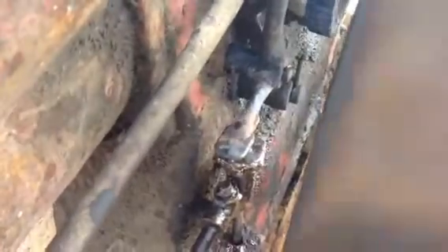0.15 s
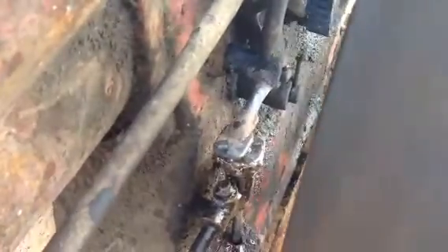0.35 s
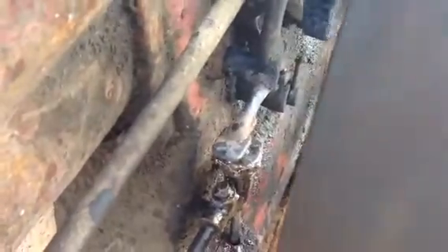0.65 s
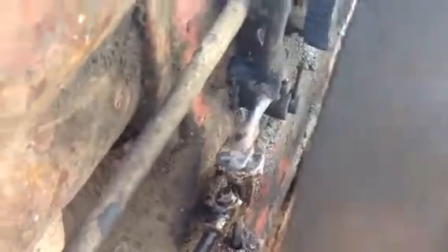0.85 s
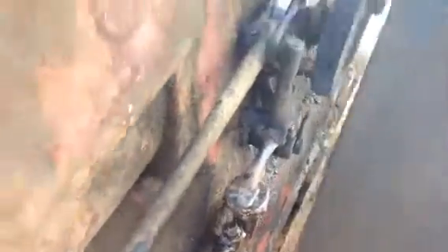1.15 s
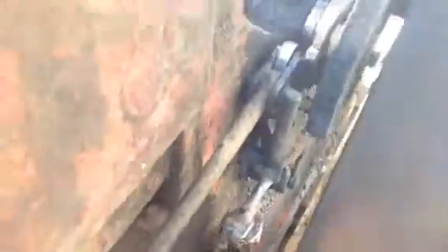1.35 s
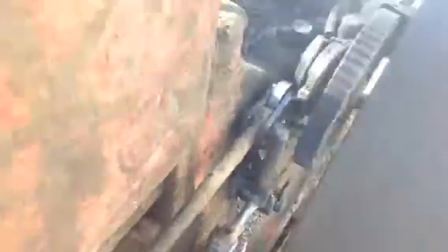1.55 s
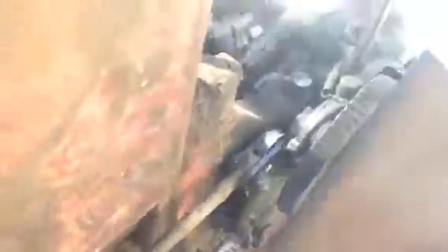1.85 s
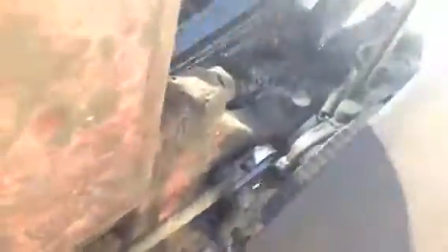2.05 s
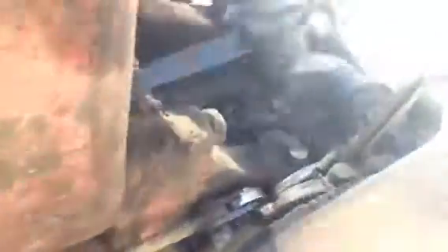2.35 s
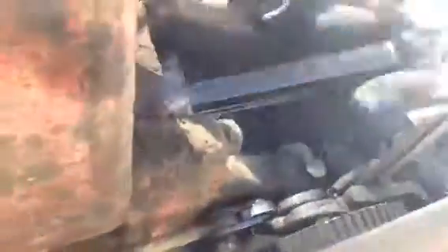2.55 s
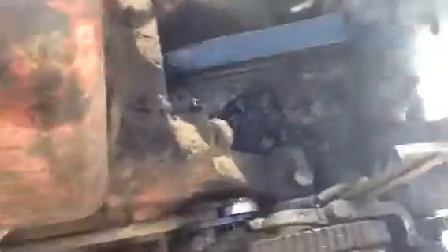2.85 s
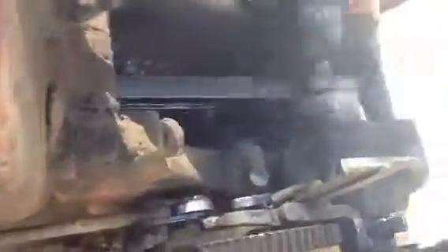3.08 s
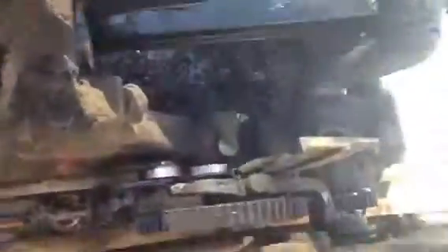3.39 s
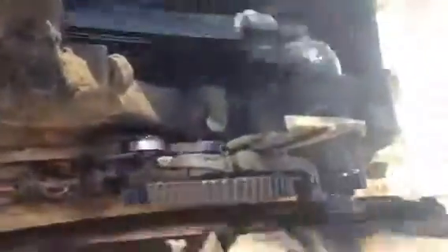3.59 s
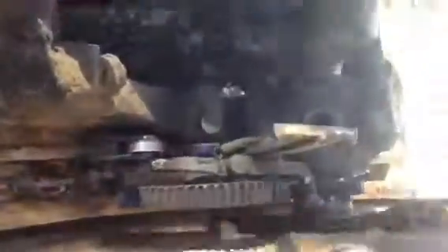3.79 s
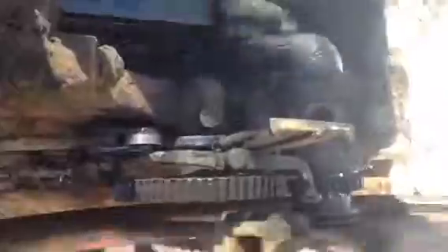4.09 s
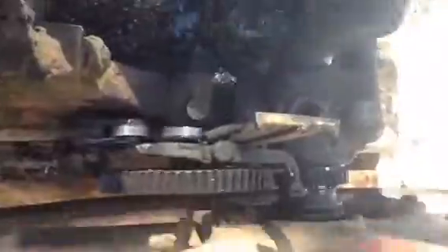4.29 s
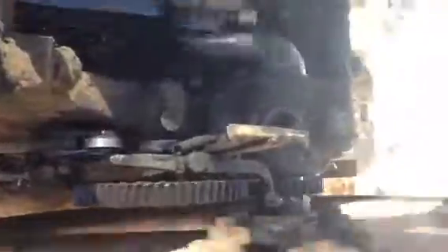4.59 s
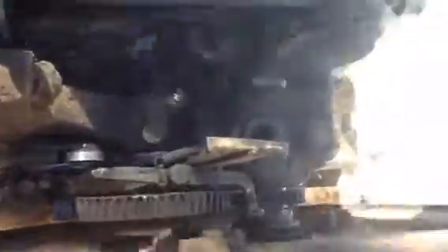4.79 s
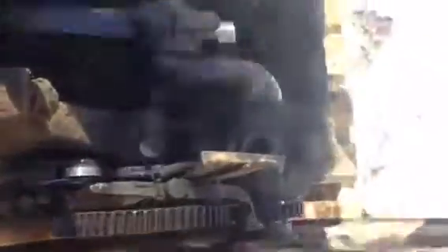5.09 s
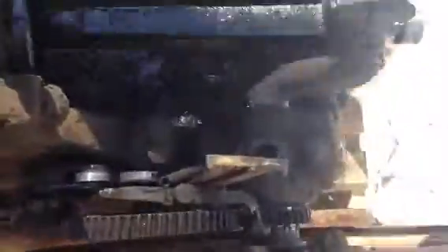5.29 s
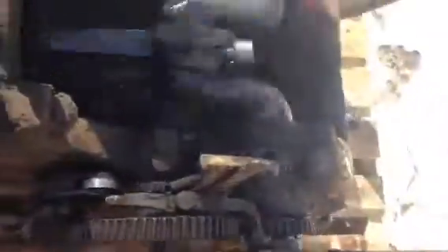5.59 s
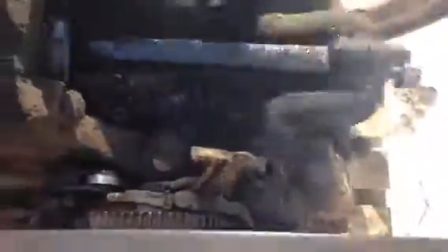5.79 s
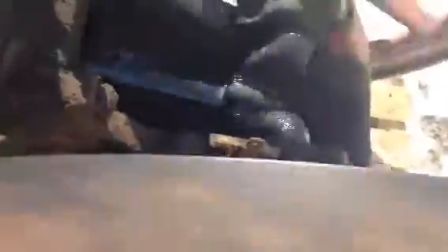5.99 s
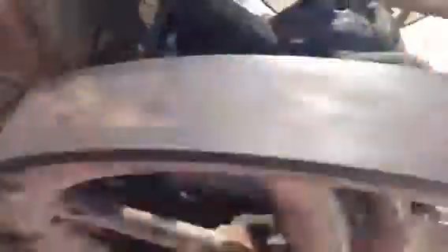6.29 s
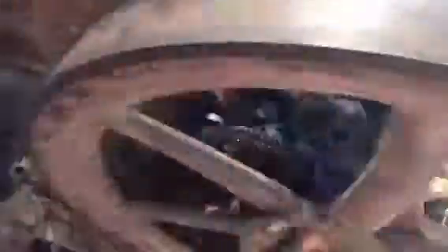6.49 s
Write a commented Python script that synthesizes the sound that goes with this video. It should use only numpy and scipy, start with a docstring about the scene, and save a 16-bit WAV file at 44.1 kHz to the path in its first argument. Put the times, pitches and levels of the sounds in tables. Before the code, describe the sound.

Heavy metal knocks repeat a little over twice a second as an old flywheel engine turns outdoors, slowly losing speed. Rods tap back between the knocks, a latch clacks every second turn, and springs tick over a soft rumble and hiss. The close microphone moves along the machine, so an early ringing hum fades and brief gusts from the flywheel hit it from about two seconds on.

```python
"""An old hit-and-miss engine coasts outdoors at a little over two turns a second, slowly losing speed.
Each turn, the load on the crank reverses with a hollow knock, then the linkage taps and knocks back.
Every second turn the steel governor latch clacks. Gears rumble, dry spots rub, loose parts rattle.
The microphone moves from the ringing cylinder casting to the flywheel, where puffs of air buffet it."""
import sys
import numpy as np
from scipy import signal
from scipy.fft import rfft, irfft
from scipy.io import wavfile

SR = 44100
rng = np.random.default_rng(int(sys.argv[2]) if len(sys.argv) > 2 else 0)


def store_wav(level_fs):
    """Save 16-bit WAV to argv[1]."""
    pcm = np.round(np.clip(np.atleast_2d(level_fs), -1, 1) * 32767)
    wavfile.write(sys.argv[1], SR, pcm.T.astype(np.int16))


N = 292824
TIME = np.arange(N) / SR


def from_db(db):
    """Turn decibels into a gain."""
    return 10 ** (np.asarray(db) / 20)

def rms_one(x):
    """Scale a signal to an average (rms) strength of 1."""
    return x / np.sqrt(np.mean(x ** 2) + 1e-20)

def gain_at(colour, hz):
    """Read gains from a colour: a table of how strong the lows and highs are."""
    points_hz, db = np.transpose(colour)
    return from_db(np.interp(np.log(hz + 1e-3), np.log(points_hz), db))

def noise(colour):
    """Steady noise of a given colour."""
    hz = np.fft.rfftfreq(N, 1 / SR)
    return rms_one(irfft(rfft(rng.standard_normal(N)) * gain_at(colour, hz) * (hz > 20), N))

def drift(rate):
    """Random wavering that glides to `rate` new values a second."""
    return np.interp(TIME * rate, np.arange(N), rng.standard_normal(N))

def ring(drive, hz, t60):
    """Shake one ringing tone. Its ring time, t60, is the seconds it takes to fade by 60 dB."""
    decay, step = from_db(-60 / (t60 * SR)), 2 * np.pi * hz / SR
    return signal.lfilter([0, np.sin(step)], [1, -2 * decay * np.cos(step), decay ** 2], drive + 1e-18)

def uneven(times, level_db, spread_db=1.0):
    """No two strokes are alike: give each a slightly different level."""
    return level_db + spread_db * rng.standard_normal(len(times))

def strike(times, levels_db, tones, contact_s, spread_db):
    """Blows on metal: each of its tones swells during the contact, then rings out."""
    out, age = np.zeros(N), TIME[:SR // 2]
    starts = np.clip(times * SR, 0, N - 1).astype(int)
    for hz, tone_db, t60 in tones:
        clicks = np.zeros(N)
        clicks[starts] = from_db(uneven(times, levels_db + tone_db, spread_db))
        tone = -np.sin(2 * np.pi * hz * age) * from_db(-60 * age / t60) * (1 - np.exp(-age / contact_s))
        out += signal.oaconvolve(clicks, tone)[:N]
    return out

def clatter(times, levels_db, colour, peaks, band, t60, rise_s, tail_db, chatter_db=-1.5):
    """Iron parts ring at so many pitches that a blow is a burst of noise with a longer tail."""
    size, peak_width, tail_t60 = 8192, 0.018, 0.31
    hz, age = np.fft.rfftfreq(size, 1 / SR), TIME[:size]
    bottom, top = {"bass": (25, 700), "middle": (700, 3500), "treble": (3500, SR / 2)}[band]
    lift_db = sum(db / (1 + ((hz / centre - 1) / peak_width) ** 2) for centre, db in peaks)
    shape = rms_one(gain_at(colour, hz) * from_db(lift_db) * (hz >= bottom) * (hz < top))
    spectra = rfft(rng.standard_normal((len(times), size))) * shape
    edges, bursts = np.geomspace(bottom, top, 4), 0
    for low, high in zip(edges, edges[1:]):
        pace = (low / edges[1]) ** 0.44   # the highs die first
        fade = from_db(-60 * age * pace / t60) + from_db(tail_db - 60 * age * pace / tail_t60)
        bursts = bursts + irfft(spectra * (hz >= low) * (hz < high)) * fade
    bursts = bursts * (1 - np.exp(-age / rise_s)) * from_db(levels_db)[:, None]
    out = np.zeros(N + size)
    for start, burst in zip(np.clip(times * SR, 0, N - 1).astype(int), bursts):
        out[start:start + size] += burst
    return out[:N] * from_db(chatter_db * drift(900))

def crank_turns():
    """When each turn starts, and its number, with one extra beyond each end of the scene."""
    times = np.r_[-0.15, np.array(KNOCK_BEATS)[:, 0], 6.652]
    return times, np.arange(len(times)) - 1

def passes(angle, creep_per_s=0, every=1):
    """When the crank passes a slowly creeping angle, counted in turns after the main knock."""
    times, turns = crank_turns()
    targets = np.arange(-every, turns[-1], every) + angle
    crept = targets + creep_per_s * np.interp(targets, turns, times)
    moments = np.interp(crept, turns, times)
    return moments[(moments > 0) & (moments < TIME[-1])]

# How well the moving microphone hears each part:
# (time [s], casting [dB], frame boom [dB], linkage treble [dB], linkage ping [dB])
MICROPHONE_PATH = [(0, -2.5, -12, -6.5, -7), (0.7, -1, -5, -13, -12.5), (1.4, -1.5, -3.5, -6.5, -1.5),
                   (2.6, -10, 0, -2, 2.5), (3.6, -22, 2, 0.5, 1.5), (5.3, -32, 0, 0, -11),
                   (6.64, -17, 4, -4.5, -23)]
def nearness(part, times):
    """Decibels that a part gains or loses as the microphone moves."""
    path_s, *levels = np.transpose(MICROPHONE_PATH)
    return np.interp(times, path_s, levels[["casting", "frame", "linkage", "ping"].index(part)])


# Noise of the gears and bearings: (time [s], rumble [dB], hiss [dB])
GEAR_LEVELS = [(0, -36, -49), (1, -42, -45), (2, -41, -44), (3, -36, -45), (4, -38.5, -45), (5, -43, -50.5),
               (6.64, -44.5, -50)]
# Its colour: (frequency [Hz], level [dB])
GEAR_COLOUR = [(30, -18), (85, -4), (187, -2.5), (300, 2), (480, -3), (650, -4), (900, -13.5), (1400, -16),
               (1900, -15), (3000, -23), (5500, -31), (9000, -37.5), (15500, -45)]
# Sliding hiss through one turn: (angle [turns], level [dB])
SLIDING_HISS = [(0, -1), (.2, -6), (.33, -1), (.5, -3.5), (.68, 1), (.8, -4.5), (.9, 0), (1, 5)]
# Tones of the casting, the cylinder's iron body: (pitch [Hz], level [dB], ring time [s])
CASTING_TONES = [(510, -12, 0.41), (574.9, 3.5, 0.24), (642, -5.5, 0.28), (701.5, -12, 0.28),
                 (1814, -13, 0.16)]
# Its hum, loudest with the microphone near: (time [s], level [dB])
HUM_LEVELS = [(0, -33), (1, -32.5), (1.8, -31), (2.5, -51.5), (3.5, -50.5), (6.64, -83)]
def running_noise(hum_sag_db=4.5):
    """Gears rumble and keep the casting humming; sliding parts hiss in step with the crank."""
    times, *levels = np.transpose(GEAR_LEVELS)
    rumble_db, hiss_db = (np.interp(TIME, times, level) for level in levels)
    hum_db = np.interp(TIME, *np.transpose(HUM_LEVELS))
    angle = np.interp(TIME, *crank_turns()) % 1
    slide_db = np.interp(angle, *np.transpose(SLIDING_HISS))
    filters = (signal.butter(2, 1000, side, fs=SR, output="sos") for side in ("low", "high"))
    lows, highs = (rms_one(signal.sosfilt(sos, noise(GEAR_COLOUR))) for sos in filters)
    rumble = lows * from_db(rumble_db - 3 + 6.8 * drift(40))
    hiss = highs * from_db(hiss_db + slide_db + 2.64 * drift(130))
    hum = sum(from_db(db) * ring(rng.standard_normal(N), hz, t60) for hz, db, t60 in CASTING_TONES)
    hum = rms_one(hum) * from_db(hum_db + 0.5 - hum_sag_db * angle)   # each knock renews the hum
    whine = rms_one(ring(rng.standard_normal(N), hz=1920, t60=0.017))
    return rumble + hiss + hum + whine * from_db(hum_db - 22.5 + 9 * drift(29.77))

# The biggest swirls of air: (time [s], level [dB], half length [s])
SWIRLS = [(2.185, -20, 0.0086), (2.37, -17, 0.018), (2.44, -14.5, 0.021), (2.517, -14, 0.011),
          (2.98, -6.5, 0.0063), (3.099, -22.5, 0.0031), (3.712, -2.5, 0.0029), (4.038, -14.5, 0.0086),
          (4.399, -13.5, 0.0081), (4.455, -17, 0.0078), (4.483, -10, 0.0027), (4.907, -17.5, 0.0095),
          (4.946, -13.5, 0.0056), (4.972, -10.5, 0.0076), (5.754, -23.5, 0.0048)]
# The flywheel's breeze: (time [s], level [dB])
BREEZE = [(0, -58), (2.2, -54), (2.42, -46.5), (3.35, -40.5), (3.72, -36.5), (3.88, -39), (4.45, -34.5),
          (5.2, -89), (5.77, -27.5), (5.92, -55), (6.64, -45)]
# Their colours: (frequency [Hz], level [dB])
SWIRL_COLOUR = [(18, -37), (30, -3.5), (198, 3.5), (309, -3.5), (439, -2), (636, -9), (809, -27),
                (973, -18), (1360, -41), (1890, -26), (2500, -43), (3250, -50), (5500, -120)]
BREEZE_COLOUR = [(25, -10), (75, 0.5), (130, -1.5), (300, -8.5), (600, -40), (1500, -56), (4000, -59)]
def air_puffs():
    """The flywheel fans a lumpy breeze whose swirls swell and collapse on the microphone."""
    power = sum(from_db(2 * db) * np.exp(-2 * np.abs(TIME - at) / half_s) for at, db, half_s in SWIRLS)
    swirls = from_db(-0.5 + 3.8 * drift(500)) * np.sqrt(power) * noise(SWIRL_COLOUR)
    breeze_db = np.interp(TIME, *np.transpose(BREEZE)) + 4.6 * drift(50)
    return swirls + from_db(breeze_db) * noise(BREEZE_COLOUR)

# The push rod's colour and the pitches that stand out: (frequency [Hz], level [dB])
ROD_COLOUR = [(100, -10), (500, 2), (1000, -20), (1250, -21), (1400, 6.5), (1560, 0.5), (1720, -30),
              (1950, -0.5), (2250, -7.5), (2700, -14.5), (3500, -8), (5200, -21.5), (8000, -30.5),
              (15000, -53)]
ROD_PEAKS = [(1430, 0.91), (2018, 5.6), (3590, 2.3), (4220, 4.8), (5329, 13.4), (6793, 5)]
def rod_taps():
    """The push rod takes up its slack: a thin metallic tap just ahead of the return knock."""
    times = passes(0.393, creep_per_s=-0.0021)
    rod = ROD_COLOUR, ROD_PEAKS
    middle_db = uneven(times, -20) + 0.22 * nearness("ping", times)
    treble_db = -33.5 + nearness("linkage", times)
    body = clatter(times, middle_db, *rod, "middle", t60=0.07, rise_s=0.00086, tail_db=-28)
    return body + clatter(times, treble_db, *rod, "treble", t60=0.052, rise_s=0.00046, tail_db=-24)

# The return knock's colour and the pitches that stand out: (frequency [Hz], level [dB])
LINKAGE_COLOUR = [(29, -51), (50, -20), (299, 7.5), (460, -0.5), (598, -3), (919, -8.5), (1170, -7),
                  (1280, -10.5), (1520, 0), (1710, -13), (2500, -12), (3100, -19), (4230, -27.5),
                  (4660, -32), (15000, -60)]
LINKAGE_PEAKS = [(263, 6.8), (576, 5.7), (1792, 8.9), (2099, 9.6), (3186, 4), (4225, 4.9), (4882, 2.1)]
# The linkage's ping: (pitch [Hz], level [dB], ring time [s])
PING_TONES = [(1144, 4.5, 0.087), (1187, -5.5, 0.082), (367.4, -7.5, 0.15), (1398, -14.5, 0.1)]
def return_knocks():
    """A lighter blow at the other end of the stroke makes the linkage ping."""
    times = passes(0.438)
    linkage = LINKAGE_COLOUR, LINKAGE_PEAKS
    near_db = nearness("ping", times)
    treble_db = -33.5 + nearness("linkage", times)
    thud = clatter(times, uneven(times, -21), *linkage, "bass", t60=0.19, rise_s=0.0016, tail_db=-10)
    body = clatter(times, -19.5 + 0.14 * near_db, *linkage, "middle",
                   t60=0.11, rise_s=0.0018, tail_db=-35)
    edge = clatter(times, treble_db, *linkage, "treble", t60=0.055, rise_s=0.00027, tail_db=-18)
    return thud + body + edge + strike(times, near_db - 20, PING_TONES, contact_s=0.0021, spread_db=1.5)

# The latch catches or lets go: (time [s], middle [dB], treble [dB], steel ring [dB])
CLACKS = [(0.1, -8.5, -13.5, -10.5), (0.266, -16.5, -21, -15), (0.93, -11, -19, -33),
          (1.098, -16, -21, -19), (1.787, -9, -21.5, -8.5), (1.958, -23, -22, -13), (2.659, -11, -24, -27),
          (2.843, -20, -27, -31), (3.567, -12.5, -22, -11), (3.729, -21.5, -23.5, -15),
          (4.495, -13.5, -20.5, -26), (5.456, -15, -22, -30), (5.635, -26, -33, -14),
          (6.452, -15, -29, -35), (6.63, -35, -32.5, -15)]
# A clack's colour and the pitches that stand out: (frequency [Hz], level [dB])
CLACK_COLOUR = [(59, -37), (100, -22), (386, -15.5), (552, -11), (697, -7), (825, -13.5), (1590, -11),
                (1800, -10), (2040, -12), (2810, -9), (4100, -14), (4460, -15), (4960, -18), (8950, -19.5),
                (15500, -46.5)]
CLACK_PEAKS = [(1819, 6.6), (2228, 10.2), (2519, 1.7), (2863, 2.2), (3924, 6.4), (4540, 11.2), (5205, 1.3),
               (6200, 2.2), (7149, 9.5), (8812, 2.4)]
# Tones of the latch and its bracket: (pitch [Hz], level [dB], ring time [s])
STEEL_TONES = [(1318, -13, .08), (1815, -7, .09), (2850, -10, .07), (3050, -11, .06), (3924, -19, .06),
               (4584, -9.5, .065), (7149, -19, .045), (8760, -21, .04)]
BRACKET_TONES = [(470, -6, 0.05), (509, -4, 0.06), (569, -10, 0.06)]
def latch_clacks():
    """Steel scuffs on steel, snaps home and bounces; the bracket and the casting ring along."""
    times, middle_db, treble_db, steel_db = np.transpose(CLACKS)
    latch = CLACK_COLOUR, CLACK_PEAKS
    scuff = clatter(times - 0.006, middle_db - 13, *latch, "middle",
                    t60=0.14, rise_s=0.0013, tail_db=-28)
    thud = clatter(times, middle_db - 5, *latch, "bass", t60=0.094, rise_s=0.0088, tail_db=-6)
    body = clatter(times, middle_db + 0.5, *latch, "middle", t60=0.077, rise_s=0.0019, tail_db=-42)
    crack = clatter(times, treble_db + 8, *latch, "treble",
                    t60=0.029, rise_s=0.0019, tail_db=-39, chatter_db=4)
    steel = strike(times, steel_db, STEEL_TONES, contact_s=0.0035, spread_db=3)
    bracket = strike(times + 0.008, middle_db + 7.5, BRACKET_TONES, contact_s=0.015, spread_db=1.5)
    bounce = clatter(times + 0.0028, treble_db + 3, SPRING_COLOUR, SPRING_PEAKS, "treble",
                     t60=0.013, rise_s=0.00026, tail_db=-36)
    casting_db = -13 + 2 * nearness("casting", times)
    casting = strike(times, casting_db, CASTING_TONES, contact_s=0.004, spread_db=3)
    return scuff + thud + body + crack + bounce + steel + bracket + casting

# Ticks in one round of the cam, which takes two crank turns:
# (angle [turns], creep [turns/s], treble [dB], middle [dB], how much nearness counts [factor])
SPRING_TICKS = [(0.131, -0.0035, -26, -27, 0.5), (0.622, -0.007, -35, -34, 1),
                (0.692, -0.0021, -21, -25, 2), (0.85, 0.0125, -36, -27, 1), (1.124, -0.006, -32, -34, 0),
                (1.694, -0.0002, -21.5, -24.5, 1), (1.868, 0.0128, -35, -35, 0.5)]
# A tick's colour and the pitches that stand out: (frequency [Hz], level [dB])
SPRING_COLOUR = [(590, -24), (1000, -11.5), (1990, -2), (3490, -3), (4340, 2.5), (4980, 0), (5980, 1),
                 (6870, -6), (8540, -9), (12500, -17), (15500, -22)]
SPRING_PEAKS = [(2444, 1.7), (4540, 1.3), (5964, 1), (7929, 6.5), (9286, 7.1), (10195, 4.5)]
def spring_ticks():
    """Springs and pins snap back into place each time the cam goes round."""
    ticks = [(at, *rest) for angle, creep, *rest in SPRING_TICKS for at in passes(angle, creep, every=2)]
    times, treble_db, middle_db, weight = np.transpose(ticks)
    spring = SPRING_COLOUR, SPRING_PEAKS
    lift_db = uneven(times, 0) + weight * nearness("linkage", times)
    snap = clatter(times, treble_db + lift_db, *spring, "treble",
                   t60=0.032, rise_s=0.0014, tail_db=-38.5, chatter_db=3.5)
    return snap + clatter(times, middle_db - 3 + 0.54 * lift_db, *spring, "middle",
                          t60=0.047, rise_s=0.0015, tail_db=-32.5)

def loose_parts(count=80, spread_db=4.5):
    """Worn pins and washers rattle faintly at random moments."""
    draws = rng.random((count, 3))
    times = draws[:, 0] * TIME[-1]
    middle_db, treble_db = spread_db * (2 * draws[:, 1:].T - 1)
    rattle = clatter(times, middle_db - 42, ROD_COLOUR, CLACK_PEAKS, "middle",
                     t60=0.065, rise_s=0.003, tail_db=-27)
    return rattle + clatter(times, treble_db - 46, SPRING_COLOUR, CLACK_PEAKS, "treble",
                            t60=0.055, rise_s=0.0014, tail_db=-29)

# One knock a turn, further apart as the flywheel slows: (time [s], level [dB])
KNOCK_BEATS = [(0.253, -17), (0.675, -18), (1.088, -16), (1.521, -13), (1.951, -10.5), (2.392, -14.5),
               (2.83, -12), (3.291, -13), (3.742, -11.5), (4.216, -13.5), (4.679, -16), (5.171, -15.5),
               (5.651, -13.5), (6.156, -16)]
# The knock's low and upper colours and the pitches that stand out: (frequency [Hz], level [dB])
LOW_IRON_COLOUR = [(40, -34), (80, -9.5), (140, 1), (200, -7), (260, -4), (330, -0.5), (420, -5), (520, 0),
                   (650, 2), (780, -9)]
IRON_COLOUR = [(410, -30), (700, -18.5), (827, -7), (1110, 5.5), (1380, -7), (1550, -1.5), (2060, -7),
               (2220, -9.5), (4440, -14), (9820, -21.5), (15000, -39)]
IRON_PEAKS = [(425, 9.5), (1388, 16), (2088, 12.5), (2380, 8), (2680, 2.5)]
# The frame's boom: (pitch [Hz], level [dB], ring time [s])
FRAME_TONES = [(193.9, 0.5, 0.14), (222, -2.5, 0.065), (335.8, -14, 0.15), (377, -17, 0.079),
               (525, -21, 0.049), (1163, -23, 0.11), (1306, -14.5, 0.069), (1378, 4, 0.027)]
def main_knocks():
    """The load on the crank reverses: a heavy blow makes the frame boom and the casting ring."""
    times, middle_db = np.transpose(KNOCK_BEATS)
    iron = IRON_COLOUR, IRON_PEAKS
    on_cam = np.arange(len(times)) % 2 == 0   # every second knock has a hard edge
    treble_db = np.where(on_cam, -12.5, -31) + nearness("linkage", times)
    treble_db += 0.45 * (middle_db - middle_db.max())
    frame_db, casting_db = nearness("frame", times), nearness("casting", times)
    thud = clatter(times, uneven(times, -13.5), LOW_IRON_COLOUR, IRON_PEAKS, "bass",
                   t60=0.089, rise_s=0.00064, tail_db=-9)
    body = clatter(times, middle_db + 0.5, *iron, "middle", t60=0.072, rise_s=0.0029, tail_db=-24)
    edge = clatter(times, treble_db, *iron, "treble", t60=0.029, rise_s=0.0021, tail_db=-28)
    boom = strike(times, frame_db + 0.5, FRAME_TONES, contact_s=0.023, spread_db=0.65)
    casting = strike(times, casting_db - 13, CASTING_TONES, contact_s=0.0056, spread_db=1)
    return thud + body + edge + boom + jolts(times, frame_db - 7.5) + casting

def jolts(times, levels_db, width_s=0.00043, delay_s=0.00203):
    """A knock's first sharp pulse comes back again and again, once per period of the boom's pitch, blunter each
    time."""
    age, boom_hz = TIME[:SR // 20] - delay_s, FRAME_TONES[0][0]
    pulses = sum(-np.exp(-((age - k / boom_hz) / (width_s * np.sqrt(k + 1))) ** 2) for k in range(4))
    clicks = np.zeros(N)
    clicks[(times * SR).astype(int)] = from_db(levels_db)
    low_cut = signal.butter(2, 130, "high", fs=SR, output="sos")
    return signal.sosfilt(low_cut, signal.oaconvolve(clicks, pulses)[:N])

# Dry spots on the cam's round: (angle [turns], level [dB], half length [s], pitch [Hz])
DRY_SPOTS = [(0.66, -36.5, 0.014, 1760), (0.907, -50.5, 0.047, 5200), (0.19, -39.5, 0.016, 1900)]
def rubs(fade_db=1.5):
    """Dry spots stick and slip as the cam comes round, fainter as the microphone moves away."""
    out = np.zeros(N)
    for angle, db, half_s, hz in DRY_SPOTS:
        friction = rng.standard_normal(N) * from_db(6.6 * drift(400))
        swells = sum(np.exp(-((TIME - at) / half_s) ** 2) for at in passes(angle, every=2))
        out += rms_one(ring(friction, hz, t60=0.0052)) * from_db(db) * swells
    return out * from_db(-fade_db * TIME / TIME[-1])

# Chinks out of step with the crank: (time [s], level [dB], pitch [Hz])
JOINT_CHINKS = [(1.847, -27.5, 3180), (3.822, -29, 2600), (3.852, -19.5, 2290), (4.241, -33, 3600),
                (4.294, -37, 2500), (4.34, -36, 2830)]
def chinks(t60=0.056, rise_s=0.0011):
    """A slack joint chatters briefly around one pitch."""
    out = np.zeros(N)
    for start, db, hz in JOINT_CHINKS:
        age = np.maximum(TIME - start, 0)
        loudness = from_db(db - 60 * np.minimum(age / t60, 2)) * (1 - np.exp(-age / rise_s))
        out += rms_one(ring(rng.standard_normal(N), hz, t60=0.0028)) * loudness
    return out

def scene():
    """All parts of the engine, heard from close by in one channel."""
    blows = main_knocks() + rod_taps() + return_knocks() + latch_clacks()
    small_sounds = spring_ticks() + rubs() + chinks() + loose_parts()
    return (blows + small_sounds + running_noise() + air_puffs())[None]

def record(dry, low_cut_hz=42, high_cut_hz=15600):
    """The small microphone loses the deepest bass, rounds the loudest peaks and cuts the very top."""
    thin = signal.sosfilt(signal.butter(2, low_cut_hz, "high", fs=SR, output="sos"), dry)
    rounded = 0.82 * np.tanh(thin / 1.037)
    return signal.sosfilt(signal.ellip(10, .2, 80, high_cut_hz, fs=SR, output="sos"), rounded)


dry = scene()
out = record(dry)
store_wav(out)
```